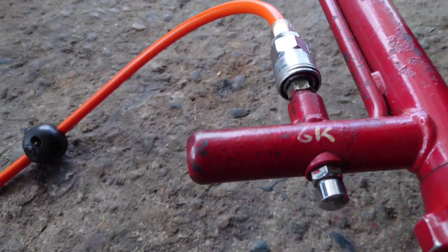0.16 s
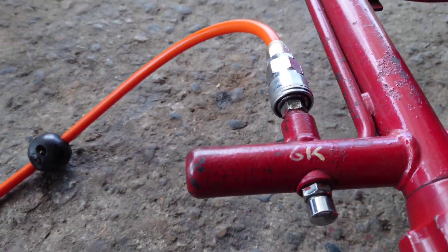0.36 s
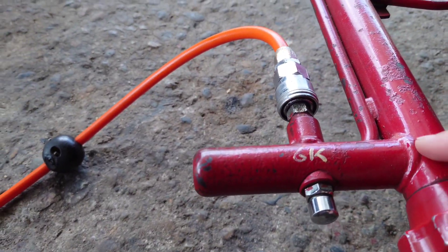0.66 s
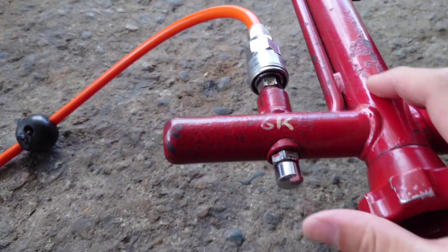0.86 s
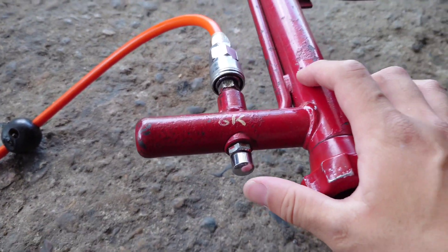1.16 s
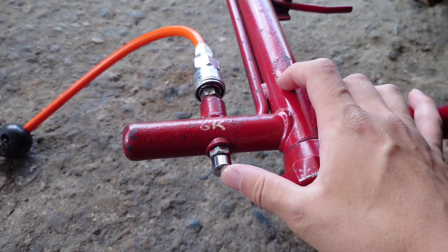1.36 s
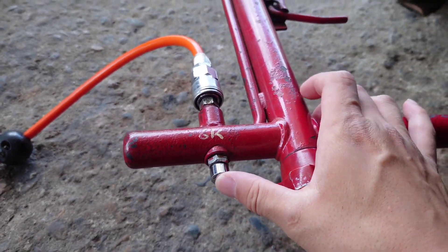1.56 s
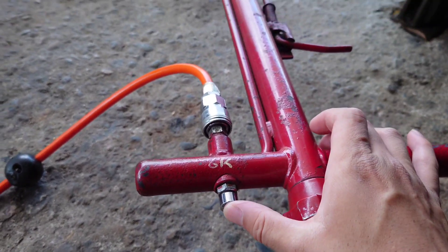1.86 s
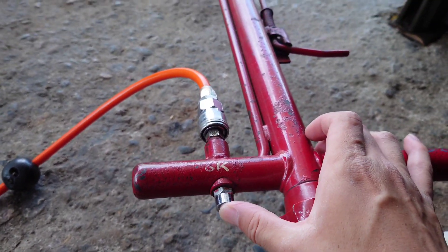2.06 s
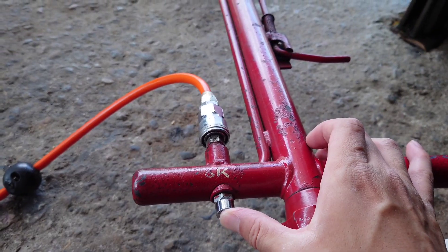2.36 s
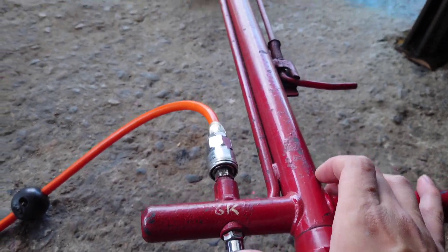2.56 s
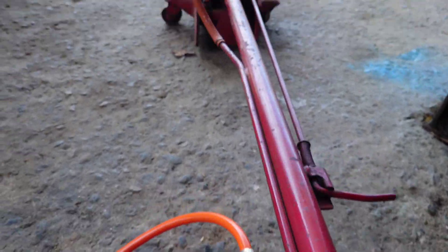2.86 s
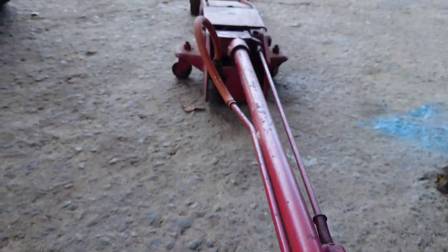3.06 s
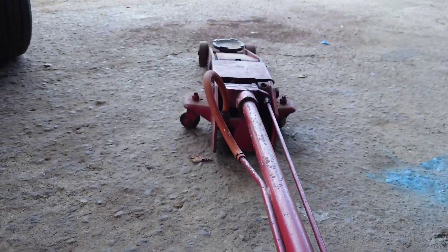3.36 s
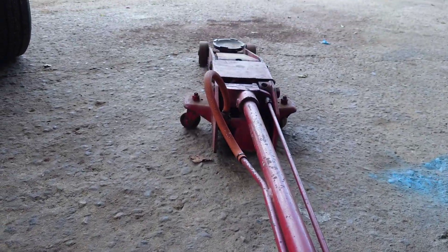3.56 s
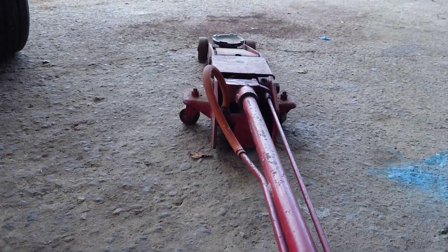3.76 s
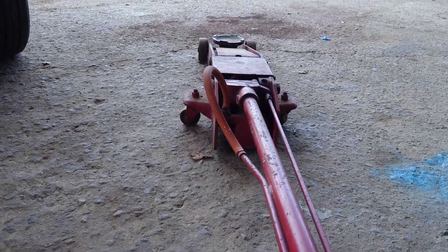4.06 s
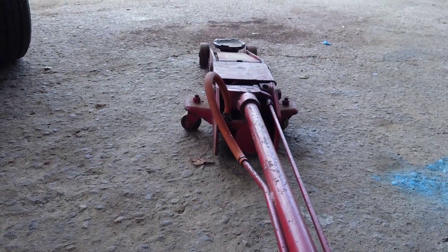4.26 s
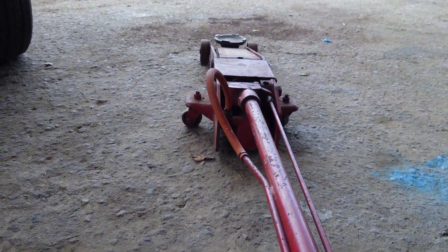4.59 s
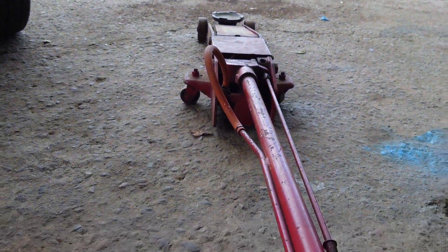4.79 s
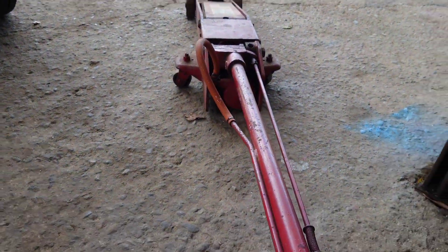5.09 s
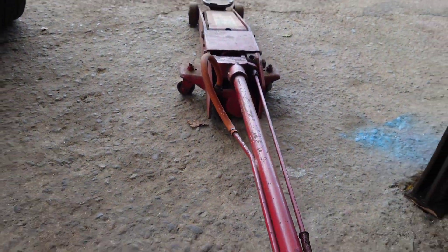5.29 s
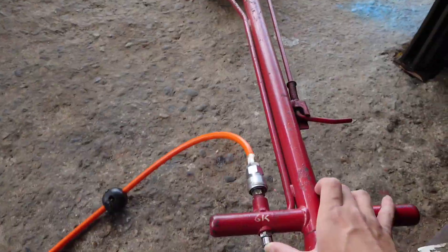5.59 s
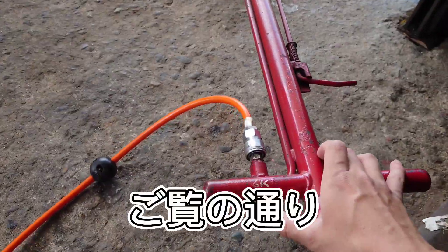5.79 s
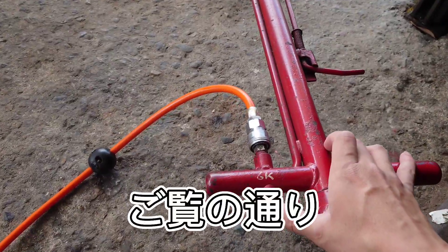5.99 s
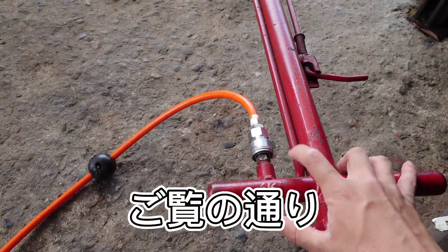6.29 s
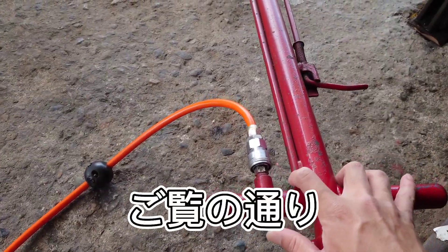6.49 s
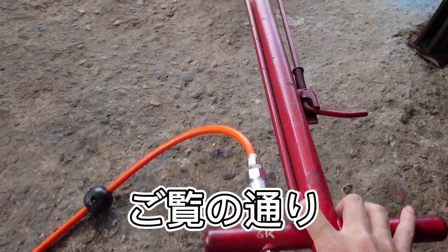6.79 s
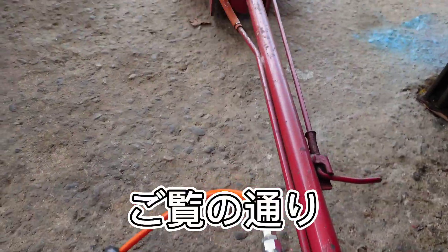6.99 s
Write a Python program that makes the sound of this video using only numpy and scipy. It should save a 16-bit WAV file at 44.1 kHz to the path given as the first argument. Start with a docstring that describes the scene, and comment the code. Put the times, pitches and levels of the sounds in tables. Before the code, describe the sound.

In a slightly echoing garage, an air-driven floor jack is switched on three times: briefly, then for about two seconds, then briefly again. Each time a hiss leads into loud, snapping air blasts, about ten a second, and air drains away in the pauses. A quieter compressor chugs behind it throughout. The handheld microphone, a few steps from the pump, picks up small ticks early on, and a faint distant drone swells late.

```python
"""Air-driven floor jack in a garage

A button press lets air hiss into the jack's pump, a few steps away. Each stroke ends with the exhaust
valve snapping open: a thud and a blast of air through the muffler. After release the air bleeds out,
once with a low hum. A piston compressor thumps and whistles behind it, over faint hiss and rustle.
A camera ticks in the hand early on, and a far drone swells late."""
import sys
import numpy as np
from scipy import signal
from scipy.fft import rfft, irfft, next_fast_len
from scipy.io import wavfile
from scipy.ndimage import uniform_filter1d, map_coordinates

SR = 44100
rng = np.random.default_rng(int(sys.argv[2]) if len(sys.argv) > 2 else 0)


def to_wav(sig):
    """Store sig (one row per channel, or 1-D mono) as 16-bit WAV at the path in sys.argv[1].

    Samples outside -1..1 are clipped; the rate is SR.
    """
    pcm = np.clip(np.atleast_2d(sig), -1, 1) * 32767
    pcm = np.round(pcm).astype(np.int16)
    wavfile.write(sys.argv[1], SR, pcm.T)  # frames by channels


N = 314874
T = np.arange(N) / SR

# The compressor's thump and its echoes off the walls: (delay [s], gain)
WALL_ECHOES = [(-.0006, 1), (.0058, .25), (.0405, .4), (.0545, .25), (.0597, .25), (.0663, .25)]
# How the thump's strength drifts: (time [s], level [dB])
THUMP_LEVEL = [(0, 2), (2.2, -0.4), (3.75, -1.5), (6.3, -3.5)]
# Ringing notes: (pitch [Hz], width [Hz], level [dB])
TANK_NOTES = [(165, 7, -5), (240, 20, -8), (267, 7, -9), (360, 14, -7), (434, 10, -3), (463, 4, 6),
              (514.5, 5, 0)]  # compressor tank
REED_NOTES = [(2230, 82, -4), (3124, 50, 0.5), (3380, 110, -1), (4270, 120, -5.5), (4860, 120, 1),
              (9070, 140, -6.5), (14000, 230, -24)]  # compressor valves
MUFFLER_NOTES = [(2660, 59, -11), (3253, 108, 1.5), (3980, 140, -2), (4300, 190, -2.5), (4840, 165, 0.5),
                 (5670, 150, -5.5)]  # exhaust cavity
NOZZLE_NOTES = [(6460, 230, 10), (7630, 370, 3), (9500, 68, -14), (11920, 300, 1), (13200, 270, -4.5)]  # outlet holes
# Tone colours of the noises: (frequency [Hz], relative level [dB])
RUMBLE_COLOUR = [(12, -44), (20, -14), (65, 0), (221, -5), (306, -4), (360, 1), (394, -9), (455, 1),
                 (566, -7), (665, -6.5), (769, -13), (905, -13.5), (1500, -30), (1950, -58), (3300, -120)]  # compressor motor
HISS_COLOUR = [(590, -12), (1000, -4.5), (2880, -9), (3230, -11.5), (4020, -7.5), (4830, -7.5), (6740, -28),
               (9090, -19.5), (10200, -21.5), (13900, -18.5), (15600, -28)]  # background hiss
RUSTLE_COLOUR = [(3820, -40), (6500, -10), (7750, 0), (10000, -4), (12500, -4), (15600, -10)]  # high rustle
LEAK_COLOUR = [(600, -25), (1800, -17), (3300, -4), (4500, 1), (5300, -1), (7000, -26), (11500, -16),
               (14000, -6), (15400, -18)]  # air slipping past the button
FILL_COLOUR = [(350, -23), (600, -16), (768, -5.5), (851, -15), (924, -9), (1540, -11.5), (3040, -3.5),
               (3310, 0), (7000, -21), (9100, -51), (15400, -120)]  # air filling the pump
FIZZ_COLOUR = [(3530, -27), (6000, -8.5), (6790, -10.5), (8100, -3.5), (11200, -13), (13900, -12.5),
               (15600, -22)]  # treble of the flowing air
BLEED_COLOUR = [(470, -48), (800, -16), (1100, -13), (1540, -13.5), (2250, -2.5), (3010, -5), (3420, 1),
                (4170, 2), (7000, -16), (9100, -29), (15400, -120)]  # air draining out
BLAST_COLOUR = [(820, -23), (1400, -15), (2580, -5.5), (2880, -8), (3250, -4), (4770, -2), (6040, -7),
                (7000, -5), (9100, -16.5), (15400, -120)]  # air through the muffler
JET_COLOUR = [(3530, -27.5), (6000, -13.5), (7130, -15.5), (7740, -1.5), (9310, 0.5), (10700, -4.5),
              (11600, -3.5), (12500, -6.5), (14000, -1.5), (15400, -6), (16000, -22)]  # bright outlet jet
FRAME_COLOUR = [(260, -52), (450, -6.5), (756, 1.5), (842, 3.5), (933, 6), (1020, 1), (1100, 4.5),
                (1250, 0), (1900, -4), (2470, -33), (4180, -120)]  # the jack's frame
DRONE_COLOUR = [(150, -32), (230, -8), (280, -1), (340, -9), (400, -16), (505, -7), (516, 0), (530, -14),
                (700, -40)]  # far drone
# How alike a noise is in both ears: (frequency [Hz], likeness [0 to 1])
RUMBLE_LIKENESS = [(30, 0.17), (150, 0.56), (500, 0.91), (1200, 0.081)]
PUMP_LIKENESS = [(500, 0.94), (2000, 0.41), (4500, 0.42), (8000, 0.68), (13000, 0.33)]
# Which way a noise leans: (frequency [Hz], left over right [dB])
HISS_PAN = [(60, -1.5), (110, 0), (200, 3), (380, 7), (700, -5), (1290, 1.5), (2380, 0.5), (4400, -3),
            (8120, -21), (15000, -5)]
PUMP_PAN = [(60, 5), (110, -0.5), (200, -7), (380, 2), (700, -3), (1290, 1), (2380, 3), (4400, 0),
            (8120, -8), (15000, -5.5)]
# How the hiss and the drone rise and fall: (time [s], level [dB])
HISS_LOUDNESS = [(0, -49.5), (.3, -53.5), (.47, -58.5), (.7, -54.5), (1.4, -55), (1.65, -60.5)]
DRONE_LOUDNESS = [(4.8, -75), (5.4, -60.5), (6.05, -56), (6.3, -53), (6.6, -58), (7.14, -65)]
# Swells of rustle: (loudest time [s], half length [s], level [dB])
RUSTLE_SWELLS = [(.05, 0.23, -62), (0.275, .06, -59), (.8, .25, -69), (1.364, 0.21, -55)]
# Ticks on the camera: (time [s], tick level [dB], knock level [dB], pitch [Hz], left over right [dB])
CAMERA_TICKS = [(.1904, -38, -42, 10100, -5), (.231, -31, -53, 11000, -17), (.2404, -31, -47, 10900, -21),
                (0.249, -29, -37, 5200, -29), (.2574, -32, -31.5, 2600, -15),
                (0.2861, -23.5, -72, 11200, -24), (.296, -36, -42, 11100, -9.5),
                (0.3068, -28, -24, 4740, -17), (.312, -26, -41, 12200, -20), (0.323, -34, -69, 11000, -15),
                (.338, -37, -55, 10600, -10), (0.739, -34, -43, 7700, -9), (1.73, -31, -62, 3900, 6)]
# Button presses: (leak start [s], leak rise [s], valve opens [s], flow stops [s],
# leak level [dB], fill level [dB], fill treble [dB])
BUTTON_PRESSES = [(2.147, .011, 2.179, 2.275, -42, -33, -42.5),
                  (3.725, .065, 3.797, 3.871, -42, -35, -44.5),
                  (6.531, .007, 6.553, 6.564, -44.5, -31.5, -42)]
# The stalled cylinder empties: (time [s], wait before fast fade [s], level [dB], treble [dB])
BLEED_OUTS = [(2.753, 0.14, -39.5, -40.5), (5.97, 0.16, -41.5, -39.5)]
# Exhaust strokes: (time [s], level [dB], valve open for [s], hollow pitch [Hz])
PUMP_STROKES = [(2.285, -14, 0.024, 1153), (2.3815, -12, 0.027, 1230), (2.4751, -12.5, 0.028, 1115),
                (2.5685, -10.5, 0.028, 920), (2.6617, -12, 0.018, 768), (3.8805, -10, 0.025, 717),
                (3.974, -10.5, .029, 744), (4.069, -10, 0.024, 1022), (4.1649, -11, 0.028, 1083),
                (4.2591, -10.5, 0.03, 1080), (4.353, -11.5, 0.028, 1054), (4.448, -10, 0.03, 937),
                (4.543, -11, .024, 718), (4.6366, -10.5, 0.025, 920), (4.7308, -9.5, .025, 1096),
                (4.8263, -9.5, 0.021, 743), (4.9189, -10.5, 0.025, 756), (5.0145, -11, .022, 743),
                (5.1075, -10.5, 0.03, 917), (5.2013, -12, 0.028, 930), (5.2958, -11.5, .024, 960),
                (5.3884, -10.5, 0.025, 960), (5.4824, -11.5, 0.027, 914), (5.5794, -12, 0.027, 834),
                (5.6754, -12.5, .028, 910), (5.7722, -13, 0.027, 1060), (5.873, -14, 0.026, 857),
                (6.573, -11.5, .024, 934), (6.667, -11.5, .033, 957), (6.76, -11.5, 0.028, 940),
                (6.8562, -12, 0.023, 1000), (6.9505, -11, 0.025, 753), (7.0447, -10.5, .024, 860),
                (7.1374, -17, .028, 810)]
# How the strokes' brightness, thud strength and left-right balance drift over time:
# (time [s], jet offset [dB], thud level [dB], left over right [dB])
STROKE_BALANCE = [(2.3, -3, -34, 1.5), (2.66, -5.5, -32, 3.5), (3.9, -6.5, -32.5, 3.5), (4.5, -6.5, -37, 3),
                  (4.8, -6.5, -47, 3), (5.1, -4.5, -39, 3), (5.5, -3, -44.5, 4), (5.87, -5, -31, 3.5),
                  (6.6, -5, -33, 3.5), (7.14, -2.5, -37, 1)]
# Echoes off the floor and nearby things: (left delay [s], right delay [s], gain)
NEAR_ECHOES = [(.0011, .0013, 0.086), (.0026, 0.0017, -0.17), (.0047, 0.0068, 0.12), (.0079, .0071, .25),
               (0.0112, .0127, -0.06)]
# Camera positions: (start [s], right ear's lag [s], echo delay factor)
CAMERA_MOVES = [(2, 0.000077, 1.17), (3.4, 0.0000045, 0.98), (4.401, 0.0000062, 1.17),
                (4.87, 0.000023, 1.16), (5.35, 0.000029, 1.2), (6.4, 0.000034, 0.93)]
# How long the garage rings: (frequency [Hz], time to fall 60 dB [s])
ROOM_DECAY = [(300, 1), (3000, 0.62), (10000, 0.13)]

TURN_S, FIRST_THUMP_S = .09719, .0454  # timing of the compressor's crank


def amp(db):
    """Turn decibels into a gain."""
    return 10 ** (np.asarray(db) / 20)


def unit(x):
    """Scale a signal to an average power of 1."""
    return x / np.sqrt(np.mean(x ** 2) + 1e-20)


def along(points, hz):
    """Read between (frequency, value) points on a log frequency scale."""
    freqs, values = np.transpose(points)
    return np.interp(np.log(hz + 1), np.log(freqs + 1), values)


def curves(rows):
    """Give one value per sample for each column after the time."""
    times, *columns = np.transpose(rows)
    return [np.interp(T, times, column) for column in columns]


def wobble(rate):
    """A smooth random curve through `rate` points a second."""
    return map_coordinates(rng.standard_normal(int(N * rate / SR) + 4), [T * rate])


def ramp(start, length):
    """Rise from 0 to 1 over `length` seconds."""
    return np.clip((T - start) / length, 0, 1)


def filtered(x, response):
    """Filter x by a function that gives each frequency's gain and phase."""
    size = next_fast_len(N + SR // 2)
    return irfft(rfft(x, size) * response(np.fft.rfftfreq(size, 1 / SR)), size)[..., :N]


def resonances(notes, hz):
    """How something with these ringing notes answers each frequency."""
    return sum((-1) ** k * amp(db) * 1j * hz * width / (pitch ** 2 - hz ** 2 + 1j * hz * width)
               for k, (pitch, width, db) in enumerate(notes))


def patchy(depth_db):
    """Two white noises that share random louder and softer patches."""
    white = rng.standard_normal((2, N))
    if not depth_db:
        return white
    spectra = signal.stft(white, nperseg=256)[2]
    patches = uniform_filter1d(uniform_filter1d(rng.standard_normal(spectra.shape[1:]), 4, 0), 8, 1)
    return signal.istft(spectra * amp(depth_db * unit(patches)), nperseg=256)[1][:, :N]


def noise(colour, likeness, pan=((1, 0),), notes=(), lift_db=0, patchy_db=0):
    """Coloured stereo noise of power 1, with any ringing notes lifted out of it."""
    mid, side = patchy(patchy_db)
    size = next_fast_len(N, real=True)
    hz = np.fft.rfftfreq(size, 1 / SR)
    spread = np.arccos(np.clip(along(likeness, hz), -1, 1)) / 2
    gain = amp(along(colour, hz)) * (1 + amp(lift_db) * np.abs(resonances(notes, hz)))
    ears = rfft(mid, size) * np.cos(spread) + rfft(side, size) * np.sin(spread) * [[1], [-1]]
    return unit(irfft(ears * gain * amp(np.outer([.5, -.5], along(pan, hz))), size)[:, :N])


def thump(t, hz):
    """About one cycle of pressure, push then pull, centred on t = 0."""
    return -np.sin(2 * np.pi * hz * t) * np.exp(-(1.35 * hz * t) ** 2)


def compressor_dip(depth_db=9, hold_s=.079, recover_s=.17):
    """A gain that drops at each pump stroke and comes back once the strokes stop."""
    times = np.array([-1] + [row[0] for row in PUMP_STROKES])
    since = T - times[np.searchsorted(times, T) - 1]
    dipped = 1 - np.clip((since - hold_s) / recover_s, 0, 1)
    return amp(-depth_db * uniform_filter1d(dipped, size=SR // 20))


def compressor():
    """One thump a turn, echoing off the walls and ringing in the tank, over motor rumble."""
    beats = FIRST_THUMP_S + TURN_S * np.arange(-2, int(N / SR / TURN_S) + 1)
    jitter, strength_db = rng.standard_normal((len(beats), 2)).T
    pulses, lead = np.zeros(N + SR), SR // 2
    pulses[np.round((beats + .0002 * jitter) * SR).astype(int) + lead] = amp(strength_db)
    t = np.arange(SR // 8) / SR - .01
    echoed = sum(gain * thump(t - delay, hz=203.4) for delay, gain in WALL_ECHOES)
    knocks = signal.fftconvolve(pulses, echoed)[lead + SR // 100:][:N]
    ring = unit(filtered(pulses[lead:][:N], lambda hz: resonances(TANK_NOTES, hz) / (1 + 1j * hz / 300)))
    dip = compressor_dip()
    beat = amp(curves(THUMP_LEVEL)[0] - 36) * dip ** .8 * knocks  # the knocks dip further than the rest
    beat += amp(-56) * ring
    # the right ear hears the beat earlier and louder
    ears = filtered(beat, lambda hz: np.exp(np.outer([-1j, 1j], .0017 * hz))) * amp([[-1.1], [1.1]])
    rumble = noise(RUMBLE_COLOUR, RUMBLE_LIKENESS, [(1, -2)], TANK_NOTES, lift_db=-8.5, patchy_db=.5)
    return dip * (ears + amp(-52.5 + wobble(11)) * rumble)


def reed_valves():
    """The compressor's valves whistle, swelling once each turn."""
    turn = ((T - FIRST_THUMP_S) / TURN_S + .18) % 1
    opening = 1.3 + np.sin(np.pi * np.clip(turn / .75, 0, 1)) ** 2
    whistle = noise([(1, 0)], [(1, .05)], HISS_PAN, REED_NOTES, lift_db=45)
    return compressor_dip() * amp(-63.5 + .8 * wobble(3.15)) * opening * whistle


def hiss_and_rustle():
    """Faint hiss, and a few swells of high rustle."""
    hiss = amp(curves(HISS_LOUDNESS)[0] + wobble(22))
    hiss = hiss * noise(HISS_COLOUR, [(1000, .14), (3000, .042)], HISS_PAN)
    swells = sum(amp(db) * np.exp(-((T - time) / half_s) ** 2) for time, half_s, db in RUSTLE_SWELLS)
    return hiss + swells * amp(.91 * wobble(25.3)) * noise(RUSTLE_COLOUR, [(1, .05)], [(1, -14)])


def camera_ticks(fade_s=.006):
    """Plastic ticks in the hand, some with a low knock through the case."""
    out, t = np.zeros((2, N + SR)), np.arange(SR // 40) / SR
    for start, db, knock_db, hz, pan_db in CAMERA_TICKS:
        grit = .6 + 1.6 * uniform_filter1d(rng.standard_normal(len(t)), size=round(3 + 12000 / hz))
        shape = amp(db - 2 - 60 * t / fade_s) * (1 - np.exp(-t / .0003))
        tick = shape * grit * np.sin(2 * np.pi * hz * t) * amp(np.array([[.5], [-.5]]) * pan_db)
        push = (1 - t / .00078) * np.exp(-t / .0011)
        ring = .17 * amp(-60 * t / .014) * np.sin(2 * np.pi * 450 * t)
        out[:, round(start * SR):][:, :len(t)] += tick + amp(knock_db + 4.5) * (push + ring)
    return out[:, :N]


def air_flow(fill_peak_s=.038, sag_db_per_s=17, drain_db_per_s=67, dull_db_per_s=32):
    """Air leaks past the moving button, rushes in until the first stroke and bleeds out after release."""
    leaks, fill, bleed, fizz = np.zeros((4, N))
    for start, rise_s, opens, stops, leak_db, fill_db, treble_db in BUTTON_PRESSES:
        leak = (T > start) * (T < opens) * amp(leak_db - 29 * (1 - ramp(start, rise_s)))
        arch_db = -3 * ((T - opens) / fill_peak_s - 1) ** 2
        arch = ramp(opens, .0037) * (T < stops) * amp(arch_db)
        leaks += leak
        fill += amp(fill_db) * arch
        fizz += amp(-5) * leak + amp(treble_db) * arch
    for start, hold_s, db, treble_db in BLEED_OUTS:
        since = np.maximum(T - start, 0)
        fall_db = sag_db_per_s * since + drain_db_per_s * np.maximum(since - hold_s, 0)
        fade = ramp(start, .0033) * amp(-fall_db)
        bleed += amp(db) * fade
        fizz += amp(treble_db - dull_db_per_s * since) * fade
    air = fill * noise(FILL_COLOUR, PUMP_LIKENESS, PUMP_PAN, patchy_db=.5)
    air += bleed * noise(BLEED_COLOUR, PUMP_LIKENESS, PUMP_PAN)
    air += leaks * noise(LEAK_COLOUR, PUMP_LIKENESS, PUMP_PAN)
    return amp(.8 * wobble(60)) * air + fizz * noise(FIZZ_COLOUR, [(1, .13)], [(1, -11)])


def pump_exhaust(body_level_db=-23.5):
    """The valve snaps open with a thud and a blast. As it shuts, the jet drops fastest."""
    blast, jet, frame, hollow, thud = np.zeros((5, 2, N + SR))
    t = np.arange(SR // 4) / SR - .01
    balance = np.array(curves(STROKE_BALANCE))
    scatter_db = rng.standard_normal((len(PUMP_STROKES), 4)) * [.61, .92, 1.5, 1.4]
    for (start, db, open_s, hollow_hz), scatter in zip(PUMP_STROKES, scatter_db):
        levels = np.insert(balance[:, round(start * SR)], 1, body_level_db)
        jet_db, body_db, thud_db, pan_db = levels + scatter
        first = round((start - .01) * SR)
        span = slice(first, first + len(t))
        gain = amp(db + np.array([[.5], [-.5]]) * pan_db) * np.clip((t + .0021) / .0026, 0, 1) ** 2
        shut_s = np.maximum(t - open_s, 0)
        # numbers that multiply a time inside amp() are fade speeds in dB per second
        blast[:, span] += gain * amp(-6.5 - 209 * t) * (.93 * amp(-700 * shut_s) + .17)
        jet[:, span] += gain * amp(jet_db - .5 - 125 * t) * (.8 * amp(-1800 * shut_s) + .21)
        frame[:, span] += gain * amp(body_db - 2 - 248 * t) * (.61 * amp(-600 * shut_s) + .43)
        hollow[:, span] += gain * amp(body_db - 3 - 580 * t) * np.sin(2 * np.pi * hollow_hz * t)
        thud[:, span] += amp(thud_db) * thump(t - [[.0007], [.0003]], hz=194.6)
    blast_pan = [(1500, -1.2), (3000, 1.3), (6000, -2.3)]
    air = blast[:, :N] * noise(BLAST_COLOUR, PUMP_LIKENESS, blast_pan, MUFFLER_NOTES,
                               lift_db=1, patchy_db=2)
    air += jet[:, :N] * noise(JET_COLOUR, PUMP_LIKENESS, PUMP_PAN, NOZZLE_NOTES,
                              lift_db=-4.5, patchy_db=2)
    air += frame[:, :N] * noise(FRAME_COLOUR, PUMP_LIKENESS, [(1, -1.2)], patchy_db=4)
    # slow noise blurs each hollow tone into a narrow band
    air += hollow[:, :N] * noise([(1, -1), (40, 8), (120, -61), (300, -120)], [(1, 1)])
    return air, thud[:, :N]


def near_echoes(x):
    """Quick echoes colour each ear differently, and their paths change as the camera moves."""
    out = np.zeros((2, N + SR))
    edges = [round(row[0] * SR) for row in CAMERA_MOVES] + [N]
    for (_, lag_s, stretch), first, last in zip(CAMERA_MOVES, edges, edges[1:]):
        size = 2 * next_fast_len((last - first) // 2 + SR // 20, real=True)
        hz = np.fft.rfftfreq(size, 1 / SR)
        echoes = sum(gain * np.exp(-2j * np.pi * stretch * np.outer([left, right], hz))
                     for left, right, gain in NEAR_ECHOES)
        lag = np.exp(-2j * np.pi * np.outer([0, lag_s], hz))
        out[:, first:first + size] += irfft(rfft(x[:, first:last], size) * (1 + echoes) * lag, size)
    return out[:, :N]


def garage_echo(x):
    """The room rings on, and the high notes die first."""
    hz, t, spectra = signal.stft(rng.standard_normal((2, SR // 2)), SR, nperseg=256)
    tail = signal.istft(spectra * amp(-60 * t / along(ROOM_DECAY, hz)[:, None]), SR, nperseg=256)[1]
    delayed = np.pad(x, ((0, 0), (400, 0)))
    return signal.fftconvolve(delayed, tail / np.linalg.norm(tail[0]), axes=1)[:, :N]


def far_drone():
    """A far, low drone that swells and fades."""
    return amp(curves(DRONE_LOUDNESS)[0] + wobble(7.2)) * noise(DRONE_COLOUR, [(1, 1)], patchy_db=4)


def draining_hum(start=5.94, end=6.235, pitch_hz=192.2, bend_start=6.175, bend_hz_per_s=260):
    """An unsteady low hum as the pressure drains; it bends upward before it stops."""
    hz = pitch_hz + bend_hz_per_s * np.maximum(T - bend_start, 0)
    shape = ramp(start, .047) * (1 - ramp(end, .025))
    level_db = -44 + ramp(start, end - start) + 2 * wobble(50)
    return shape * amp(level_db) * np.sin(2 * np.pi * np.cumsum(hz) / SR) * amp([[-1], [1]])


def scene():
    """The jack in its room, the compressor and the small sounds around them."""
    air, thud = pump_exhaust()
    jack = amp(-1) * near_echoes(air + air_flow()) + thud + amp(-15) * garage_echo(air) + draining_hum()
    return jack + compressor() + reed_valves() + far_drone() + hiss_and_rustle() + camera_ticks()


def record(dry, ceiling=.9, top_hz=16480):
    """Round off the loudest peaks and cut the very highest treble."""
    soft = dry / (1 + np.abs(dry / ceiling) ** 4) ** .25
    return filtered(soft, lambda hz: amp(np.interp(hz, [15400, 15700], [0, -22])) * (hz < top_hz))


dry = scene()
out = record(dry)
to_wav(out)
```